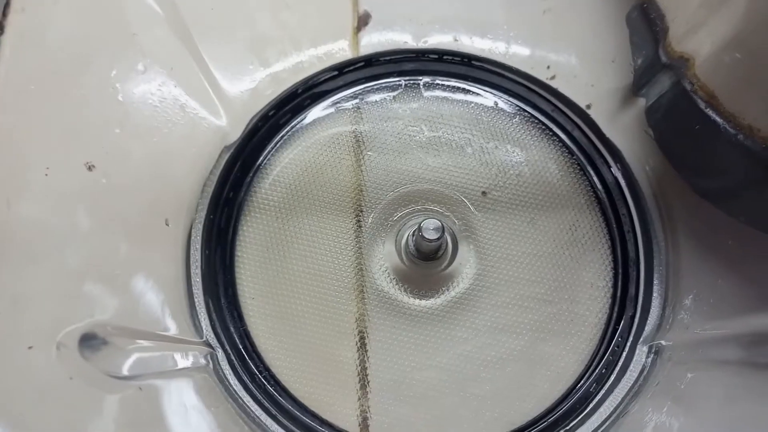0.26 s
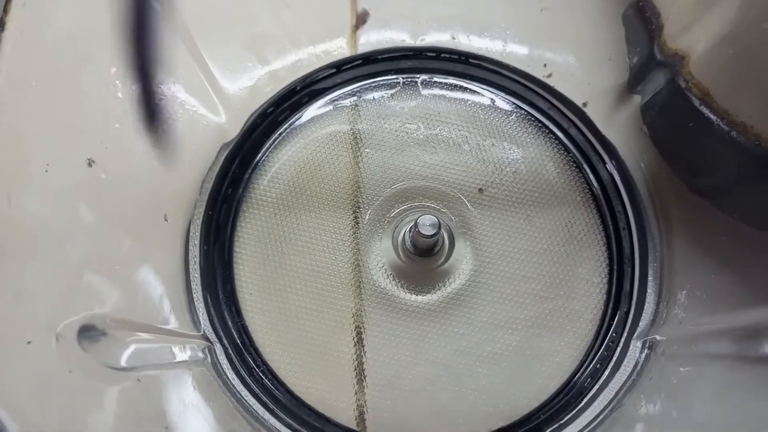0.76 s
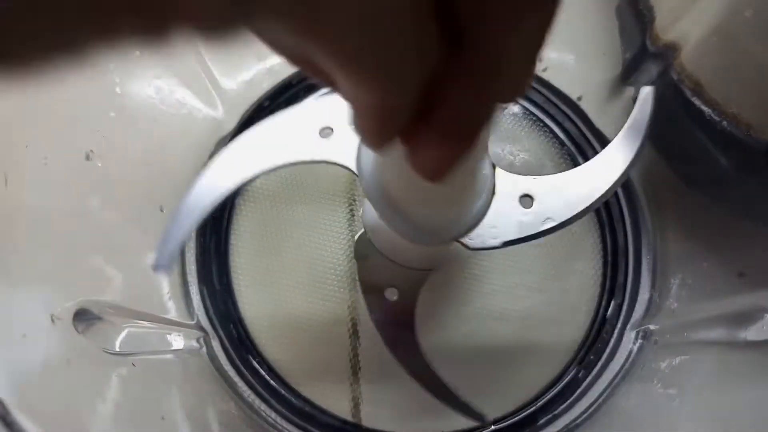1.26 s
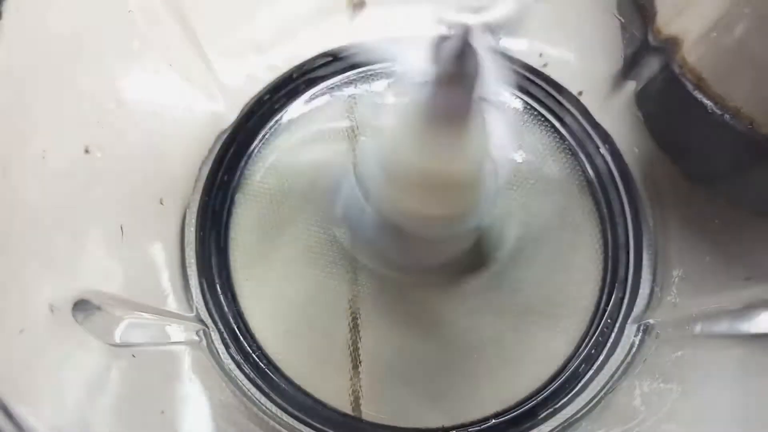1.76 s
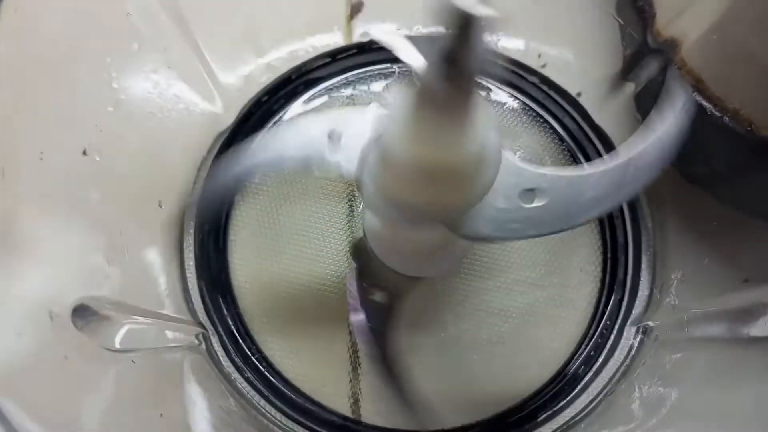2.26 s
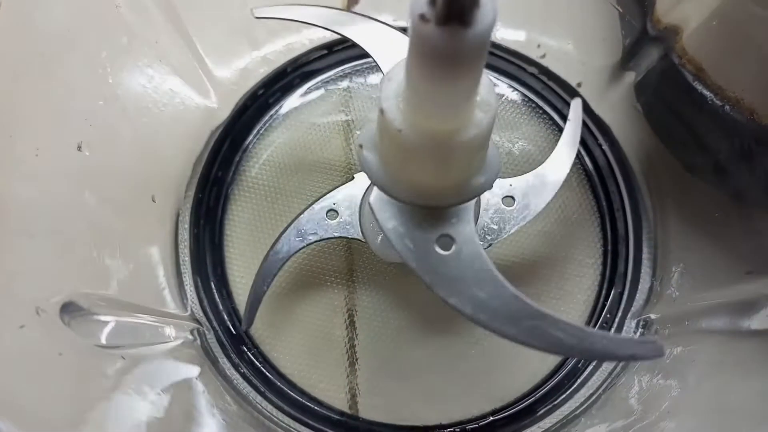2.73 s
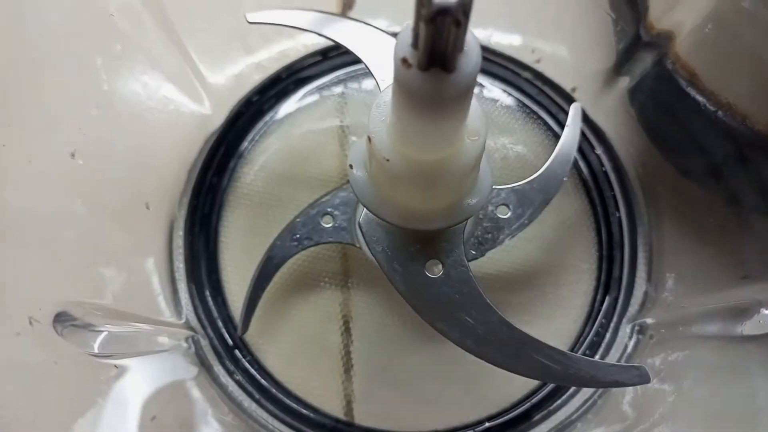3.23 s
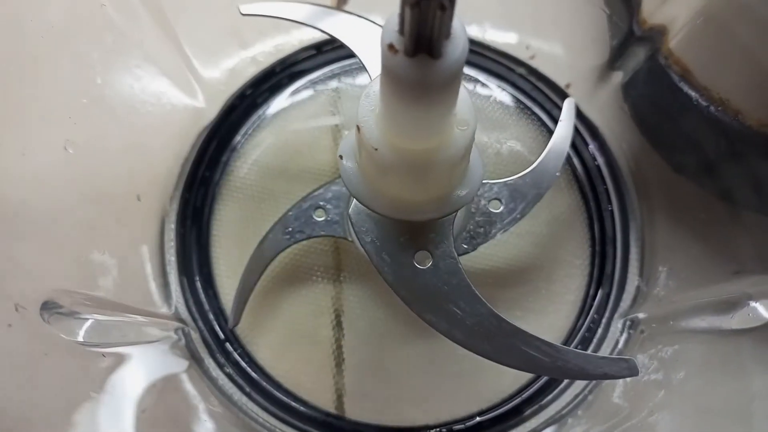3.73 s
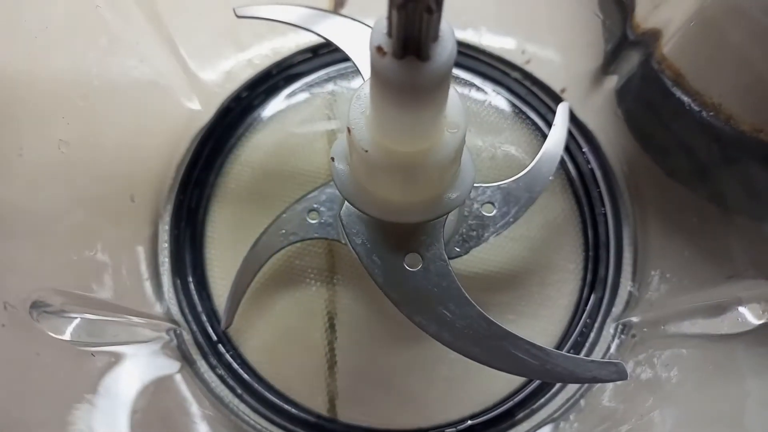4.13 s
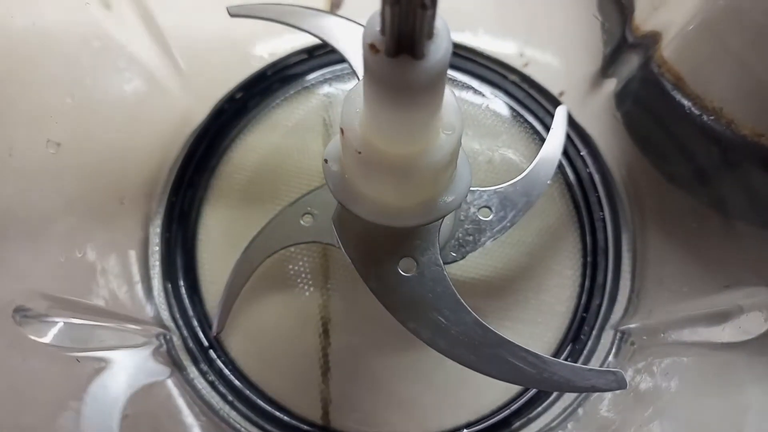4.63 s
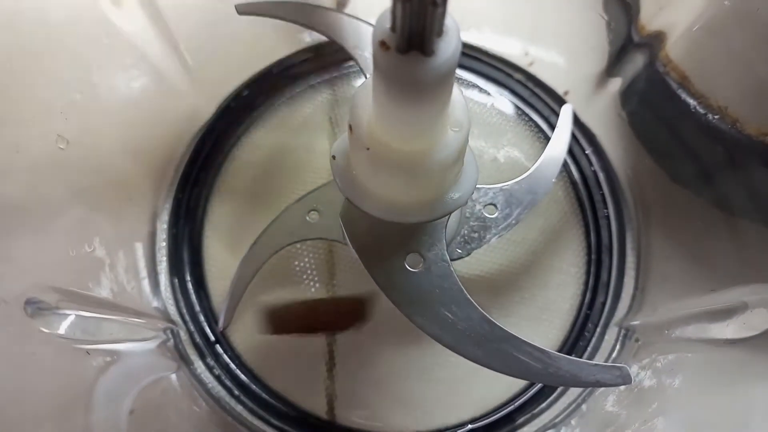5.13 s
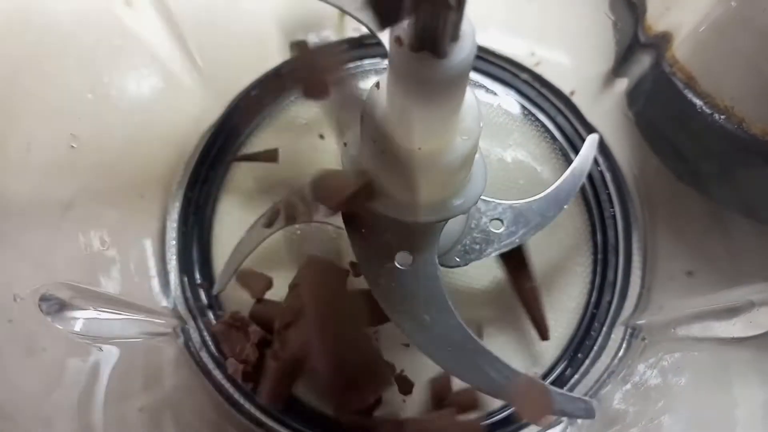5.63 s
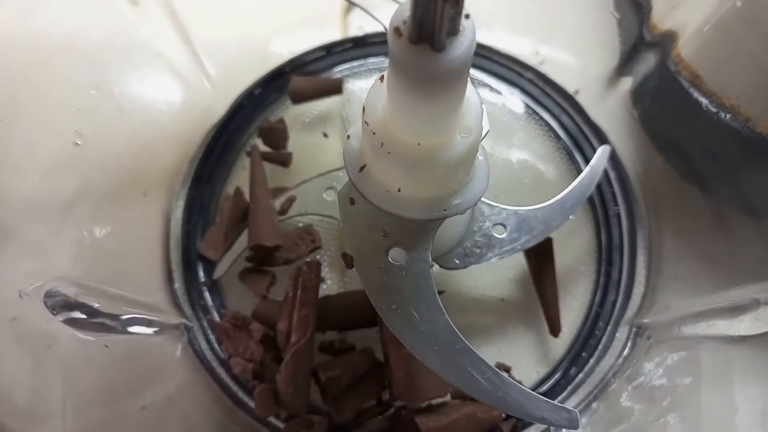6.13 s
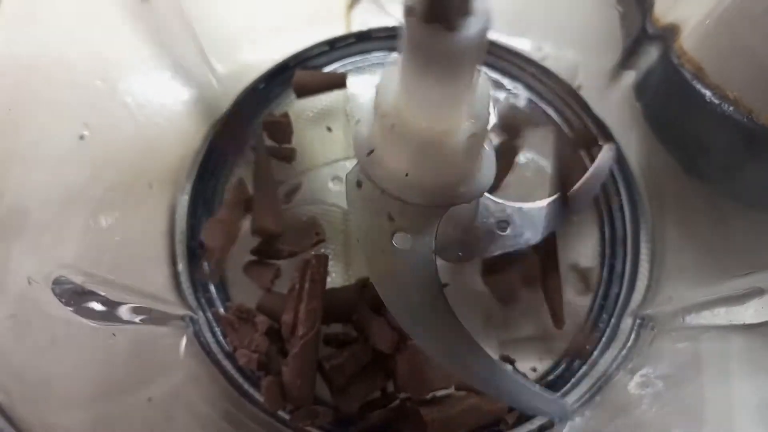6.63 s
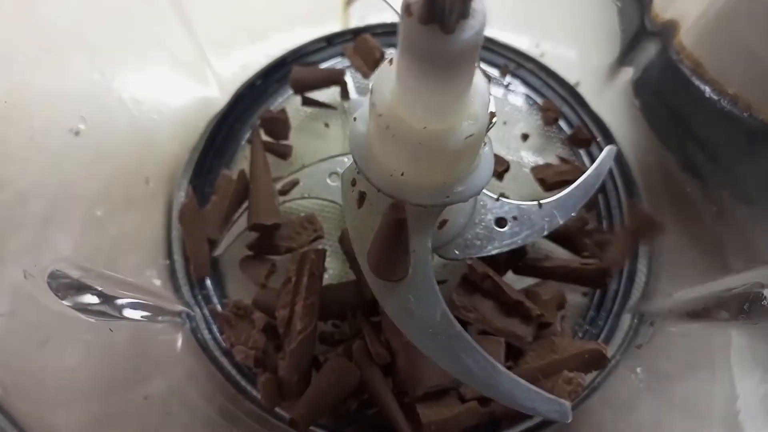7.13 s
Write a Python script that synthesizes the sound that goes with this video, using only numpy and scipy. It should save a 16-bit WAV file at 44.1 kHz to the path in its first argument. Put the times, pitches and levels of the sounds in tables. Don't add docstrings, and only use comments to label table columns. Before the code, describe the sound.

Quiet kitchen, then metal blades rattle and clink onto a pin in a glass bowl, and hard chocolate pieces crash in with sharp clatters.

```python
import sys
import numpy as np
from scipy import signal
from scipy.fft import rfft, irfft, next_fast_len
from scipy.io import wavfile

SR = 44100
rng = np.random.default_rng(int(sys.argv[2]) if len(sys.argv) > 2 else 0)


def nominal_scale(level):
    x = np.asarray(level, float) / 20
    return 10 ** x


def pcm_store(signal):
    levels = np.round(np.clip(np.atleast_2d(signal), -1, 1) * 32767)
    wavfile.write(sys.argv[1], SR, levels.astype(np.int16).T)


N = 325458


def rms_one(x):
    return x / np.sqrt(np.mean(x ** 2) + 1e-20)


def at_hz(points, hz):
    point_hz, level_db = np.transpose(points)
    return np.interp(np.log(hz), np.log(point_hz), level_db)


def add(out, s, x):
    i = max(round(s * SR), 0)
    out[i:i + len(x)] += x[:N - i]


def filtered(x, order, hz, kind="low"):
    return signal.sosfilt(signal.butter(order, hz, kind, fs=SR, output="sos"), x)


def coloured(x, spectrum):
    low, high = spectrum[0][0], spectrum[-1][0]
    edges = np.geomspace(low, high, num=int(3 * np.log2(high / low)) + 2)
    total = 0
    for k, (a, b) in enumerate(zip(edges, edges[1:])):
        total = total + nominal_scale(at_hz(spectrum, np.sqrt(a * b))) * filtered(x[k % 2], 2, [a, b], "band")
    return rms_one(total)


def resonance(x, hz, width_hz):
    r = np.exp(-np.pi * width_hz / SR)
    poles = [1, -2 * r * np.cos(2 * np.pi * hz / SR), r * r]
    return signal.lfilter([(1 - r * r) / 2, 0, (r * r - 1) / 2], poles, x)


def struck(hz, gains, t60, rise_s):
    t = np.arange(int(np.max(t60) * SR), dtype=np.float32) / SR
    turn = np.float32(2 * np.pi * hz)[:, None]
    fall = np.float32(np.log(1000) / t60)[:, None]
    modes = np.sin(turn * t) * np.exp(-fall * t)
    return (gains @ modes) * (1 - np.exp(-t / rise_s))


def shatter(top_hz):
    return rms_one(filtered(rng.standard_normal(N), 2, top_hz))


# mode in Hz, level in dB, t60 in s.
SHELL = [(1254, 4.5, 0.32), (1820, -5.5, 0.4), (2454, -8.5, 0.85), (2364, -10, 0.56), (2613, -15.5, 0.25),
         (2600, -22, 0.38), (2790, -15.5, 0.15), (3115, 6, 0.14), (3733, -9, 0.22), (4290, -11.5, 0.083),
         (4456, -18.5, 0.3), (5260, -12, 0.21), (5879, -12.5, 0.09), (6990, -23.5, 0.07)]
# mode in Hz, level in dB, t60 in s.
HOLLOW = [(309, -11, 0.034), (460, -9, 0.034), (554.4, -7, 0.086), (648, 4, 0.044), (720.4, 3.5, 0.04),
          (817, -5, 0.097)]
# Hz, dB per Hz.
TOP_TONE = [(7000, -3), (8500, -6), (10000, -10.5), (12000, -8.5), (13700, -15), (15200, -10.5),
            (17000, -16.5)]
# start in s, shell, hollow and thin edge in dB.
TAPS = [
    (0.0719, -57, -58, -59),
    (0.7358, -37.5, -55, -68),
    (1.014, -51, -53, -60),
    (1.6724, -21, -41.5, -29),
    (2.1907, -34.5, -82, -41.5),
    (2.7384, -31.5, -70, -58),
]
# start in s, shell, hollow and thin edge in dB.
FIRST_JIGGLE = [(2.8124, -29.5, -31.5, -49), (2.8561, -54, -31, -40), (2.8737, -26.5, -15.5, -31),
                (2.9507, -32, -28.5, -46.5), (3.0181, -26.5, -22.5, -33.5), (3.1009, -67.5, -31, -52),
                (3.1358, -33.5, -27, -35.5), (3.1552, -45.5, -33, -37.5), (3.1753, -26, -50.5, -37),
                (3.2305, -42, -26, -47.5), (3.2505, -29.5, -29.5, -34.5), (3.2846, -23, -35, -38.5),
                (3.3357, -43, -20.5, -27.5), (3.459, -36, -28, -26.5), (3.4668, -31, -55, -25.5),
                (3.5039, -16.5, -46, -32.5)]
# start in s, shell, hollow and thin edge in dB.
SECOND_JIGGLE = [(4.177, -37, -62, -47), (4.24, -49, -30, -30.5), (4.273, -47, -31, -67),
                 (4.2944, -32, -18.5, -42), (4.3148, -30, -22.5, -38), (4.372, -21, -18, -53),
                 (4.3894, -16, -18.5, -30), (4.4627, -49, -60, -36.5), (4.4994, -37, -40, -29),
                 (4.54, -28.5, -30, -22), (4.5552, -31, -29, -34.5), (4.6835, -33, -31, -48.5),
                 (4.7116, -32, -40.5, -39.5), (4.787, -32.5, -24.5, -38.5)]
# start in s, shell, hollow and thin edge in dB, ring t60 in s.
PIECES = [(4.9209, 3, -8, -14.5, 0.084), (5.1409, -32.5, -50, -43.5, 0.2),
          (5.3492, -37.5, -68.5, -41.5, 0.14), (5.4182, -34, -26.5, -22.5, 0.078),
          (5.4648, -41, -29, -32, 0.11), (5.5251, 0, -20, -25.5, 0.069), (5.5296, -19, -48, -42, 0.065),
          (5.5459, -17, -26, -34.5, 0.11), (5.809, -40, -48, -65.5, 0.11),
          (5.915, -61.5, -34.5, -62.5, 0.028), (6.0047, -20.5, -14.5, -29.5, 0.056),
          (6.1004, -33, -31.5, -54.5, 0.07), (6.451, -48, -59.5, -54, 0.12),
          (6.565, -44.5, -30.5, -41.5, 0.17), (6.5809, -29.5, -26.5, -27, 0.044),
          (6.6099, -25.5, -20.5, -41.5, 0.067), (6.7779, 11, -41.5, -12, 0.055),
          (6.7839, -8, -20, -27, 0.091), (6.791, -12, -37.5, -49.5, 0.048), (6.8787, -19.5, -34, -33, 0.31),
          (7.2027, -41, -71, -42, 0.15), (7.219, -47, -30, -44, 0.037), (7.277, -34, -30, -50.5, 0.12)]


def knocks():
    tap_t60_s, jiggle_t60_s = 0.043, 0.04
    crack_db, crack_steepness, crack_knee_db = -6.5, .45, -30
    out, rings = np.zeros(N), np.zeros(N)
    hz, level_db, ring_s = np.repeat(np.transpose(SHELL), 3, axis=1)
    low_hz, low_db, low_s = np.transpose(HOLLOW)
    hiss = coloured(rng.standard_normal((2, N)), TOP_TONE)
    blows = [(*r, tap_t60_s) for r in TAPS] + [(*r, jiggle_t60_s) for r in FIRST_JIGGLE + SECOND_JIGGLE] + PIECES
    for s, shell_db, hollow_db, edge_db, t60 in blows:
        t60 = np.clip(t60, .02, .3)
        odd, detune = rng.standard_normal((2, len(hz)))
        lean_db = np.select([hz < 1500, hz < 3350], [hollow_db - 21, shell_db - 17], edge_db)
        gains = nominal_scale(0.41 * level_db + lean_db + 2 * odd) * rng.choice([-1, 1], len(hz))
        mode_t60 = t60 * (ring_s / ring_s.mean()) ** .4
        shell = struck(hz * (1 + .03 * detune), gains, mode_t60, rise_s=.0014)
        add(rings, s, shell)

        odd, detune = rng.standard_normal((2, len(low_hz)))
        boom = struck(low_hz * (1 + 0.04 * detune), nominal_scale(low_db + 2.5 * odd), low_s, rise_s=0.0025)
        add(out, s, nominal_scale(hollow_db - 4.0) * boom)

        top_db = edge_db + crack_db + crack_steepness * min(edge_db - crack_knee_db, 0)
        i = round(s * SR)
        t = np.arange(len(shell))[:N - i] / SR
        decay = nominal_scale(-60 * t / .02) + .08 * nominal_scale(-60 * t / t60)
        add(out, s, nominal_scale(top_db - 8.5) * decay * hiss[i:i + len(t)])
    return out + rings * (1 + .45 * shatter(top_hz=350))


# Hz, level in dB, t60 in s.
FIRST_CRASH = [(720, -13, .15), (1056, -6, 0.15), (1200, -8.5, 0.19), (1850, -15.5, .1), (2270, -2.5, .097),
               (2424, -5.5, .25), (2627, 0, .11), (2744, -3, 0.085), (3070, -8.5, 0.14), (3200, -4.5, .12),
               (3700, -11, 0.23), (4470, -16, 0.2), (5290, -13.5, .16)]
SECOND_CRASH = [(2050, 0, 0.094), (2140, -4, .14), (2430, -1, .16), (2670, -1, 0.12), (2960, -3, 0.14),
                (3310, -5, 0.11), (3500, 0, 0.12), (5350, -5, .11)]
THIRD_CRASH = [(1843, -1, 0.17), (2352, 1.5, 0.13), (2480, -9.5, 0.22), (2606, -12, 0.37), (3058, -3, 0.13),
               (3250, -8, 0.11), (3456, -19.5, 0.17), (3813, -8.5, 0.063)]
SOFT_TICK = [(2595, 4, 0.12), (3135, 5, 0.066), (3360, -6, 0.078), (3740, -9, 0.14)]
# start in s, blow in dB, clatter in dB, clatter length in s.
CRASH_BLOWS = [
    (4.922, -10, -35, .27),
    (5.526, -24, -40.5, .14),
    (6.779, -9.5, -31, .2),
    (2.737, -38, -48, 0.054),
]


def crashes():
    clatter_per_s, fade_db, damping = 400, 15, 0.27
    out = np.zeros(N)
    for modes, blow in zip([FIRST_CRASH, SECOND_CRASH, THIRD_CRASH, SOFT_TICK], CRASH_BLOWS):
        s, db, clatter_db, lasts_s = blow
        hz, level_db, t60 = np.transpose(modes)
        signs = (-1) ** np.arange(len(hz))
        add(out, s, struck(hz, nominal_scale(db + level_db) * signs, t60, rise_s=0.00027))
        for k in range(min(int(clatter_per_s * lasts_s), 150)):
            ago_s = (k + 2 * rng.random()) / clatter_per_s
            odd = rng.standard_normal(len(hz))
            tick_db = clatter_db + 1.9 * min(rng.exponential(1), 2) - fade_db * ago_s / lasts_s
            tick_db = tick_db - 10 * (hz < 900)
            gains = nominal_scale(tick_db + .5 * level_db + 4.5 * odd) * np.sign(odd[::-1])
            tick = struck(hz * (1 + 0.016 * odd[::-1]), gains, damping * t60, rise_s=.001)
            add(out, s + ago_s, tick)
    return out * (1 + .35 * shatter(top_hz=250))


HELD_AGAIN_S = 5.8
# mode in Hz, level in dB, t60 in s.
GLASS = [
    [(1686, 2, 0.6), (1770, -10, 0.3)],
    [(748, -5.5, 0.39)],
    [(3128, -2, .17), (2930, 0.5, 0.04)],
    [(6215, 0.5, 0.054), (6370, -13, .15)],
]
# mode in Hz, level in dB, t60 in s.
HELD_RIM = [(1760, 2, 0.22), (1690, -4.5, 0.18)]
# start in s, bowl rim, bowl base and blade in dB.
CLINKS = [(2.821, -59.5, -56, -37), (2.9753, -57, -39.5, -61), (2.9822, -41.5, -35, -38),
          (3.156, -49, -46.5, -31.5), (3.1744, -40, -25, -28.5), (3.3353, -49, -24.5, -13.5),
          (3.547, -75.5, -72, -39.5), (4.1995, -69, -46, -33), (4.2886, -46.5, -50, -60),
          (4.3738, -51, -37, -32), (4.4114, -46, -34, -25), (4.557, -45, -59.5, -42),
          (4.8126, -52, -60, -52), (5.4439, -24.5, -29.5, -30), (5.4674, -65, -78.5, -45),
          (6.12, -53, -44, -66.5), (6.5458, -71, -65.5, -41), (6.5807, -46, -61.5, -28.5),
          (6.6023, -59, -61, -37), (6.672, -39.5, -71, -35), (7.1841, -69, -80, -33.5),
          (7.316, -48, -46, -46)]


def glass_touches(out):
    held_until_s, overtone_db = 5, 2.5
    for s, rim_db, base_db, blade_db in CLINKS:
        rim = GLASS[0] if held_until_s < s < HELD_AGAIN_S else HELD_RIM
        group_db = rim_db, base_db, rim_db + overtone_db, blade_db
        for modes, db in zip([rim, *GLASS[1:]], group_db):
            hz, level_db, t60 = np.transpose(modes)
            gains = nominal_scale(level_db + 3 * rng.standard_normal(len(hz)))
            add(out[int(s > HELD_AGAIN_S)], s, nominal_scale(db + 3) * struck(hz, gains, t60, rise_s=.0012))


# start in s, level in
# dB, Hz, t60 in s.
PINGS = [(5.4435, -22, 1686, .55), (.1, -43, 810, 0.14), (.13, -49, 1480, .1), (0.091, -43.5, 388, 0.17),
         (1.42, -58.5, 3150, 0.9), (1.672, -27, 824, 0.055), (1.672, -22, 1290, 0.027),
         (3.4, -28, 237, 0.095), (3.463, -32, 3830, 0.11), (4.684, -26, 1807, 0.053),
         (4.797, -28.5, 274, .07), (4.815, -44, 5879, 0.13), (4.922, -15.5, 500, 0.14),
         (5.05, -40, 1215, .3), (5.26, -50, 2400, .1), (5.527, -17, 1180, .06), (5.144, -30.5, 2350, 0.12),
         (5.446, -32, 4680, 0.21), (5.69, -45, 3950, 0.2), (6.023, -12.5, 735, 0.022),
         (6.878, -28, 2085, 0.3), (7.101, -58, 2760, 0.54)]
# start in
# s, level in dB, Hz, t60 in s.
THUDS = [(2.815, -31.5, 597, 0.075), (2.874, -19, 730, 0.055), (4.94, -25, 442, .15),
         (2.88, -34.5, 248, 0.078), (3.02, -25, 718, 0.065), (3.022, -41, 233, .07),
         (3.14, -26.5, 690, 0.07), (3.155, -37, 384, .09), (3.232, -29.5, 620, 0.063),
         (3.235, -37, 292, .1), (3.25, -22, 800, 0.066), (3.335, -24.5, 533, 0.064),
         (3.347, -28, 790, 0.047), (3.41, -31.5, 550, 0.063), (3.925, -47, 97, .35),
         (4.207, -36, 563, 0.25), (4.273, -25, 585, 0.066), (4.296, -20.5, 556, 0.084),
         (4.33, -27.5, 514, 0.093), (4.32, -42, 254, .12), (4.388, -36, 209, 0.1), (4.388, -24, 674, 0.041),
         (4.412, -32, 600, 0.045), (4.49, -33.5, 764, 0.16), (4.55, -36, 549, 0.11),
         (4.682, -32, 820, 0.16), (4.8, -24, 532, 0.089), (5.465, -38.5, 310, .07),
         (5.48, -30.5, 537, 0.12), (6.565, -32, 602, 0.1), (7.0617, -25, 190, .04)]
# start in s, level in dB, Hz, t60 in s.
RINGS = [(1.013, -48.5, 5800, 0.062), (2.876, -30.5, 2920, 0.13), (2.975, -38, 1746, 0.36),
         (2.98, -42, 1690, .5), (2.999, -38, 3050, .2), (3.171, -32.5, 1760, 0.38),
         (3.25, -38, 4460, 0.054), (3.399, -38, 4400, 0.039), (3.502, -36, 1865, 0.086),
         (4.28, -42.5, 1700, 0.13), (4.296, -36.5, 1500, 0.1), (4.374, -32, 1250, 0.04),
         (4.539, -29.5, 1070, 0.031), (4.682, -27, 1010, 0.037), (4.68, -33, 1220, .06),
         (4.682, -38, 2336, 0.079), (4.625, -45, 4900, .06), (5.072, -35, 5290, 0.077),
         (5.128, -31, 3200, 0.091), (5.167, -36, 3200, .08), (5.165, -33.5, 2264, 0.059),
         (5.42, -30.5, 1555, 0.091), (5.462, -20, 1520, 0.045), (5.528, -26.5, 1682, 0.62),
         (5.526, -29.5, 1752, .45), (5.555, -31.5, 752, 0.5), (5.81, -45.5, 3030, 0.064),
         (6.309, -51.5, 1710, 0.24), (6.45, -48, 4320, .1), (6.611, -33.5, 3134, 0.13),
         (6.641, -17, 1900, .01), (6.672, -36, 1688, .3), (6.879, -27, 2140, 0.3), (7.278, -36, 1790, .08),
         (7.277, -40, 2600, .12), (6.9, -46, 1370, .15)]
# start in s, level in dB, Hz.
TIPS = [(2.86, -21.5, 4350), (2.873, -16.5, 4460), (2.984, -25, 4860), (3.1, -33.5, 4430),
        (3.136, -28.5, 4580), (4.177, -21, 5810), (4.181, -27.5, 4570), (4.243, -27, 4390),
        (4.387, -13.5, 5879), (4.395, -18, 4450), (4.541, -11, 6060), (4.539, -21, 4640),
        (4.713, -25.5, 4390), (4.787, -24, 3570), (5.941, -38, 4290), (6.58, -21, 4740), (6.581, -16, 6060)]
# start in s, level in dB, Hz.
SETTLES = [(5.63, -46, 4500), (5.645, -54, 7700), (5.79, -50, 1250), (5.81, -49, 3850), (5.855, -53, 4400),
           (5.955, -52, 6400), (6.209, -50, 1250), (6.35, -57, 6300), (7.203, -38, 4300),
           (7.218, -36, 6140)]


def single_modes(out):
    tip_t60_s, settle_t60_s = 0.031, .08
    events = PINGS + THUDS + RINGS
    events = events + [(*r, tip_t60_s) for r in TIPS] + [(*r, settle_t60_s) for r in SETTLES]
    for s, db, hz, t60 in events:
        ring = struck(np.array([hz]), nominal_scale([db]), np.array([t60]), rise_s=0.00088)
        add(out[int(s > HELD_AGAIN_S)], s, ring)


def clinks():
    out = np.zeros((2, N))
    glass_touches(out)
    single_modes(out)
    free = np.clip((HELD_AGAIN_S - np.arange(N) / SR) / .05, 0, 1)
    return (free * out[0] + out[1]) * (1 + .18 * shatter(top_hz=120))


# Hz, level in dB, t60 in s.
BLADE_TOP = [(6800, -8, 0.093), (7400, -2.5, .1), (7900, -3, 0.08), (8800, -9.5, 0.058), (9600, -9, 0.091),
             (10040, -3, .11), (11040, -12, .07), (12100, -13.5, .07)]
# start in s, level in dB.
SHIMMERS = [(2.935, -59), (3.136, -57), (3.156, -55), (3.175, -51), (3.3355, -36), (4.2, -57), (4.242, -58),
            (4.381, -49), (4.391, -43), (4.922, -36), (5.42, -58), (5.445, -59), (6.58, -54), (6.779, -44),
            (6.88, -58), (7.19, -53)]


def shimmer():
    out = np.zeros(N)
    hz, level_db, t60 = np.transpose(BLADE_TOP)
    for s, db in SHIMMERS:
        odd = rng.standard_normal(len(hz))
        gains = nominal_scale(db + level_db + 3.5 * odd) * np.sign(odd[::-1])
        add(out, s, struck(hz, gains, t60, rise_s=0.00081))
    return out * (1 + .4 * shatter(top_hz=300))


# start in s, level in dB.
SNAPS = [(2.1904, -34), (3.3377, -25), (3.2328, -46.5), (3.272, -48), (3.304, -47), (4.232, -44.5),
         (4.444, -42.5), (3.5044, -29.5), (4.177, -30.5), (4.3875, -23.5), (4.9224, -10), (7.2018, -32)]


def foil_snaps():
    out = np.zeros(N)
    hiss = coloured(rng.standard_normal((2, N)), TOP_TONE)
    t = np.arange(SR // 10) / SR
    decay = nominal_scale(-60 * t / 0.015) + .08 * nominal_scale(-60 * t / .1)
    for s, db in SNAPS:
        i = round(s * SR)
        burst = hiss[i:i + len(t)]
        add(out, s, nominal_scale(db - 12.0) * decay[:len(burst)] * burst)
    return out


# Hz, dB per Hz.
RATTLE_TONE = [(1150, 4.5), (2400, 9), (3300, 10.5), (6500, 11), (8000, -17)]


def rustle():
    low_hz, high_hz = np.geomspace(980, 3300, num=16), np.geomspace(3450, 7800, num=16)
    low_db, high_db = at_hz(RATTLE_TONE, low_hz), at_hz(RATTLE_TONE, high_hz)
    hollow_hz, hollow_db, _ = np.transpose(HOLLOW)
    low = scattered(low_hz, low_db, per_s=3500, width_hz=55)
    high = scattered(high_hz, high_db, per_s=8000, width_hz=90)
    rub = scattered(hollow_hz, hollow_db / 2, per_s=500, width_hz=70)
    foil = coloured(grains(per_s=7700, spread_db=2.0), TOP_TONE) * (1 + .5 * shatter(top_hz=60))
    wash = scattered(low_hz, low_db, per_s=25000, width_hz=110)
    return (bouts() * [low, high, rub, foil, wash]).sum(axis=0)


def grains(per_s, spread_db):
    sizes = nominal_scale(spread_db * np.minimum(rng.exponential(1, (2, N)), 4)) * rng.choice([-1, 1], (2, N))
    clicks = sizes * (rng.random((2, N)) < per_s / SR)
    return clicks + .15 * rng.standard_normal((2, N))


def scattered(pitches, levels_db, per_s, width_hz):
    sizes = nominal_scale(3.2 * np.minimum(rng.exponential(1, N), 4)) * rng.choice([-1, 1], N)
    ticks = sizes * (rng.random(N) < per_s / SR)
    dealt = rng.integers(0, len(pitches), N)
    hold = 2500
    shift_db = 4.5 * rng.standard_normal((len(pitches), N // hold + 1))
    ticks *= nominal_scale(shift_db)[dealt, np.arange(N) // hold]
    rings = np.zeros(N)
    for k, (hz, db) in enumerate(zip(pitches, levels_db)):
        rings += nominal_scale(db) * resonance(ticks * (dealt == k) + 1e-18, hz, width_hz)
    edges_hz = [.7 * min(pitches), 1.15 * max(pitches)]
    return rms_one(filtered(rings, 3, edges_hz, "band"))


# peak in s, rise in s, fall in s, level in dB, brightness in dB.
HANDLING = [(.03, 0.2, 0.24, -59, -4), (2.928, 0.13, 0.11, -47, 0), (3.15, 0.012, 0.15, -41.5, -10),
            (3.36, 0.48, .19, -38, 0), (3.92, 0.074, 0.075, -50, -10.5), (4.398, 0.25, 0.033, -36, 0),
            (4.46, .03, 0.16, -43, 2.5), (4.7, 0.05, 0.17, -46.5, -2), (5.452, 0.057, 0.047, -37, 9),
            (5.59, 0.036, 0.088, -45, -10), (6.05, 0.27, 0.048, -53.5, 4), (6.3, 0.16, 0.19, -68.5, 14),
            (6.64, 0.2, 0.046, -38, 3), (7.28, 0.17, 0.047, -52.5, 11)]
SETTLING_BITS = [(.08, 0.089, 0.1, -50, -12), (.25, 0.016, 0.024, -46.5, -28),
                 (1.02, 0.014, 0.049, -52, -1), (1.922, 0.054, 0.035, -46.5, -1.5),
                 (3.9, 0.11, 0.051, -38.5, -20.5), (5.15, 0.08, 0.09, -46.5, 6),
                 (5.72, 0.09, 0.08, -47.5, 9.5), (6.87, .04, 0.068, -32, 4), (6.93, 0.045, 0.085, -36.5, 6)]
AVALANCHES = [(4.38, .012, .04, -31, -2), (4.945, 0.0067, 0.078, -18, -8.5),
              (5.04, 0.03, 0.096, -36.5, 4.5), (5.57, 0.019, 0.088, -34.5, -5),
              (6.8, 0.024, 0.05, -20.5, -4)]
WRAPPER = [(6.915, 0.075, 0.03, -46.5, 0.0028)]
# low rattle, high rattle, dull rub, foil crackle and dense wash in dB.
HANDLING_MIX = (-5.5, -9.5, -2, -31, -37.5)
SETTLING_MIX = (-4, -6, -17.5, -45, -52)
AVALANCHE_MIX = (-5.5, -9, -18, -40, -14)
WRAPPER_MIX = (-45, -38.5, -34, 1, -31)


def bouts():
    rise_db, fall_db, edge_s = 18.5, 10, .02
    t, levels = np.arange(N) / SR, np.zeros((5, N))
    kinds = [(HANDLING, HANDLING_MIX), (SETTLING_BITS, SETTLING_MIX),
             (AVALANCHES, AVALANCHE_MIX), (WRAPPER, WRAPPER_MIX)]
    for rows, mix_db in kinds:
        for s, rise, fall, db, bright_db in rows:
            near = slice(max(int((s - rise - edge_s) * SR), 0), int((s + fall + edge_s) * SR))
            ago = t[near] - s
            fade = np.clip(np.minimum(ago + rise, fall - ago) / edge_s + 1, 0, 1)
            swell = fade * nominal_scale(db - np.maximum(-rise_db * ago / rise, fall_db * ago / fall))
            layer_db = np.add(mix_db, np.multiply(bright_db, [0, 0.94, 0, .4, 0]))
            levels[:, near] += nominal_scale(layer_db)[:, None] * swell
    return levels


# start in s, peak in dB.
BUMPS = [(6.6437, 1.5), (6.827, -10.5), (6.832, -1.5), (6.863, -18), (6.879, -14.5), (6.911, -15),
         (6.927, -17), (6.953, -14.5), (6.992, -1), (7.0022, -12), (7.0152, -4)]


def bumps():
    out = np.zeros(N)
    push = np.zeros(int(.05 * SR))
    push[0] = -1
    soft = filtered(push, 3, 720)
    swing = filtered(soft, 3, 120, "high") - resonance(soft, hz=165, width_hz=90)
    swing = swing / np.abs(swing).max()
    for s, db in BUMPS:
        add(out, s - .0005, nominal_scale(db - 9.5) * swing)
    return out


# Hz, dB per Hz.
ROOM_TONE = [(20, -43.5), (45, -23.5), (97, -1.5), (137, -13.5), (300, -14.5), (700, -22), (2000, -22.5),
             (3300, -27), (4300, -36), (8000, -46), (17500, -47.5)]
# Hz, width in Hz, level in dB.
HUM = [(501, 24, -71.5), (542.6, 14, -67)]
# peak in s, level in dB, length in s.
RUMBLE = [(0.104, -50.5, 0.046), (2.928, -51.5, 0.068), (3.35, -45.5, 0.077), (3.96, -62, 0.04),
          (4.362, -54, 0.028), (6.027, -48, 0.048), (6.975, -36, 0.085)]


def room_tone():
    white = rng.standard_normal((3, N))
    drone, swell = np.zeros(N), np.zeros(N)
    for hz, width_hz, db in HUM:
        drone += nominal_scale(db) * rms_one(resonance(white[2], hz, width_hz))
    t = np.arange(N) / SR
    for s, db, length in RUMBLE:
        swell += nominal_scale(db) * np.exp(-((t - s) / length) ** 2)
    lumps = filtered(rng.standard_normal(N), 2, [70, 330], "band")
    return nominal_scale(-57) * coloured(white, ROOM_TONE) + drone + swell * rms_one(lumps)


def kitchen(x):
    t60_s, wall_cut_hz = 0.2, 9400
    size = next_fast_len(N + SR)
    w = 2 * np.pi * np.arange(size // 2 + 1) / size
    dull = 1 / (1 + 1j * w * SR / (2 * np.pi * wall_cut_hz))
    response = 0
    for k, lag_s in enumerate(rng.uniform(.008, .03, 10)):
        loop = nominal_scale(-60 * lag_s / t60_s) * dull * np.exp(-1j * w * lag_s * SR)
        response = response + (-1) ** k * loop / (1 - loop)
    return irfft(rfft(x, size) * response, size)[:N]


def scene():
    counter = knocks() + foil_snaps() + clinks() + rustle()
    wet = counter + nominal_scale(-20) * kitchen(counter)
    return (wet + crashes() + shimmer() + bumps() + room_tone())[None]


def top_cut(x):
    return signal.sosfilt(signal.butter(12, 16420, fs=SR, output="sos"), x)


def record(dry):
    port = dry[0] + resonance(dry[0], hz=15500, width_hz=1500)
    cut = signal.sosfilt(signal.ellip(6, .5, 30, 15950, fs=SR, output="sos"), port)
    return top_cut(np.clip(cut, -1, 1)[None])


dry = scene()
out = record(dry)
pcm_store(out)
```